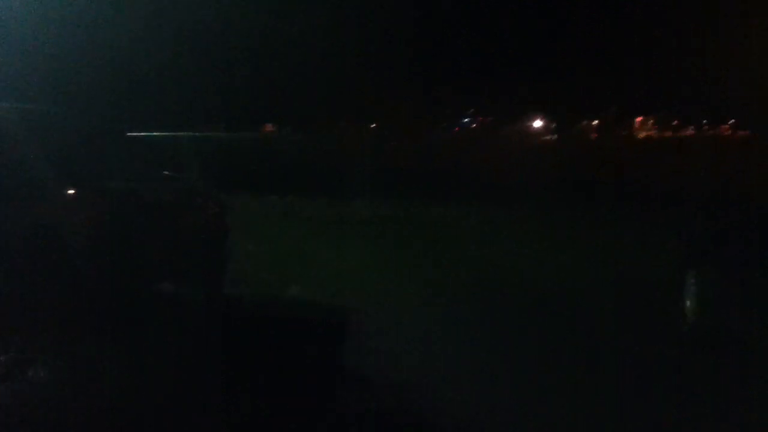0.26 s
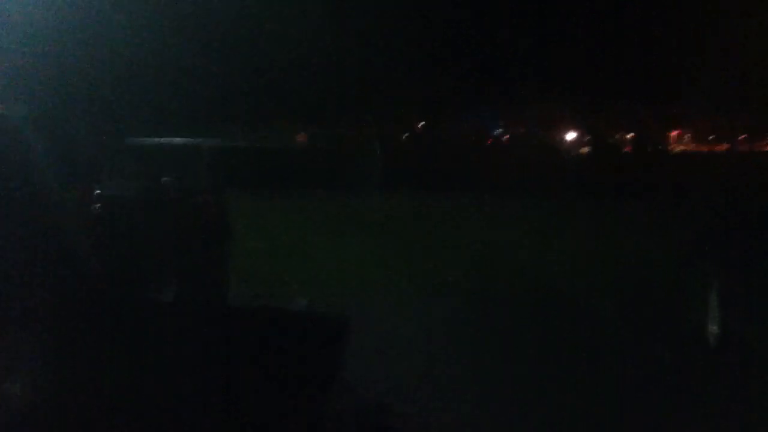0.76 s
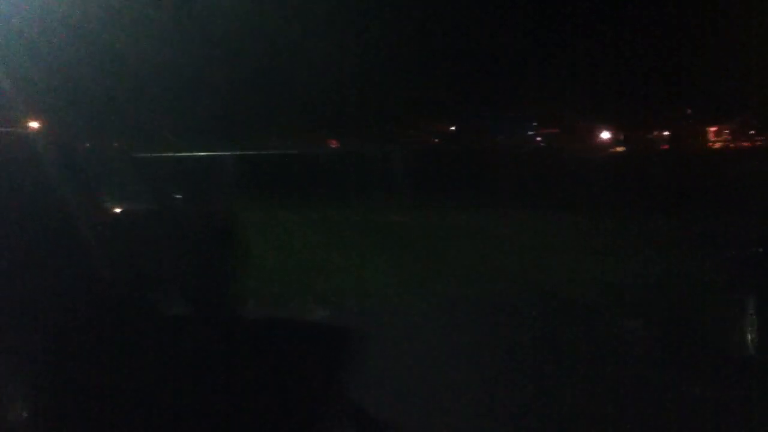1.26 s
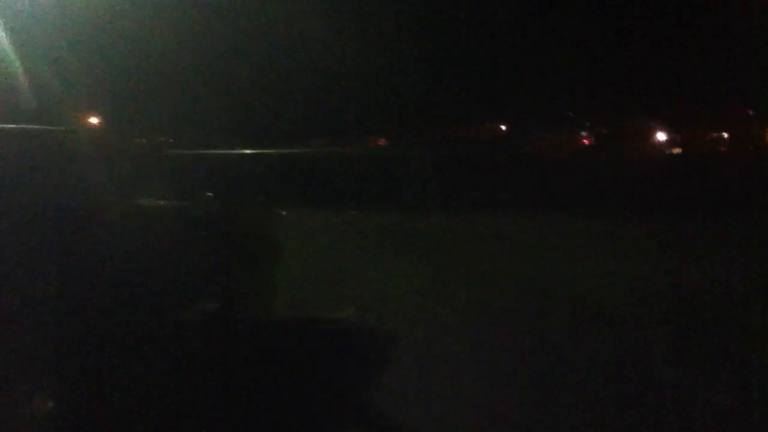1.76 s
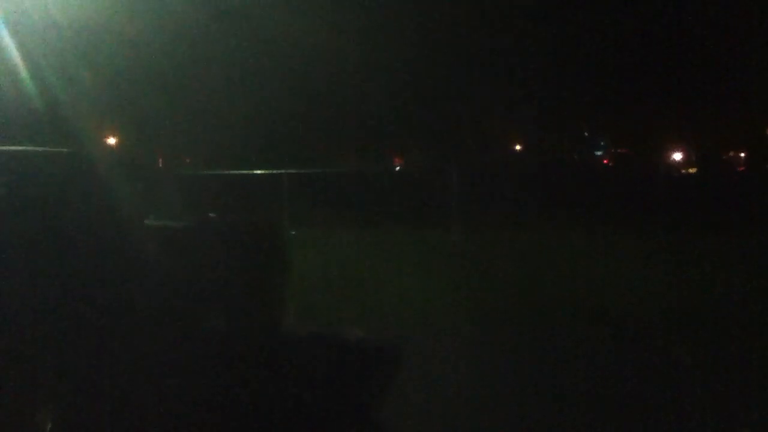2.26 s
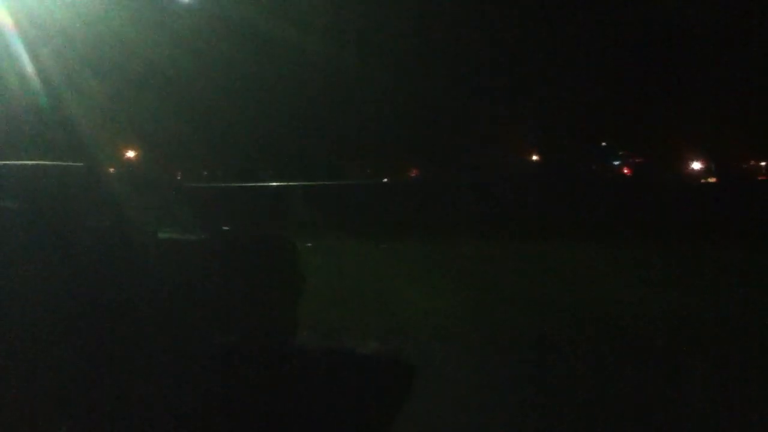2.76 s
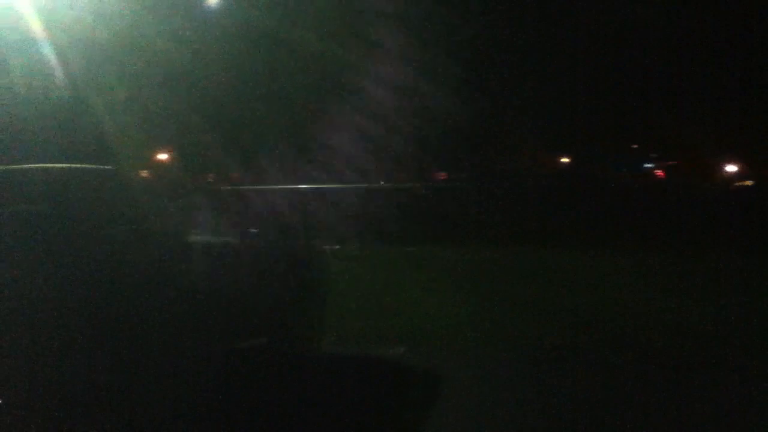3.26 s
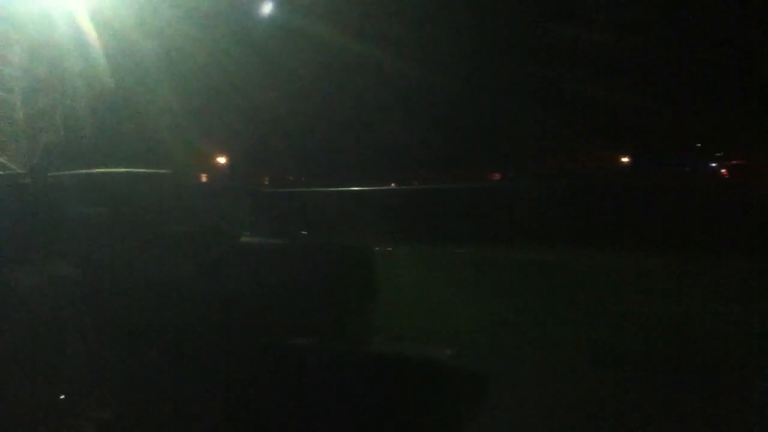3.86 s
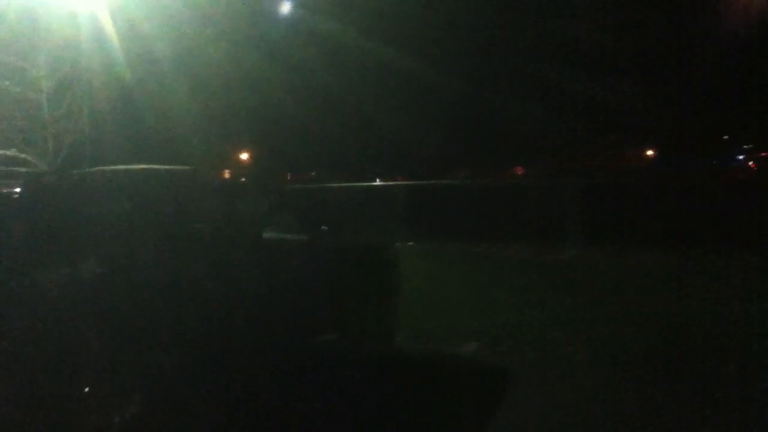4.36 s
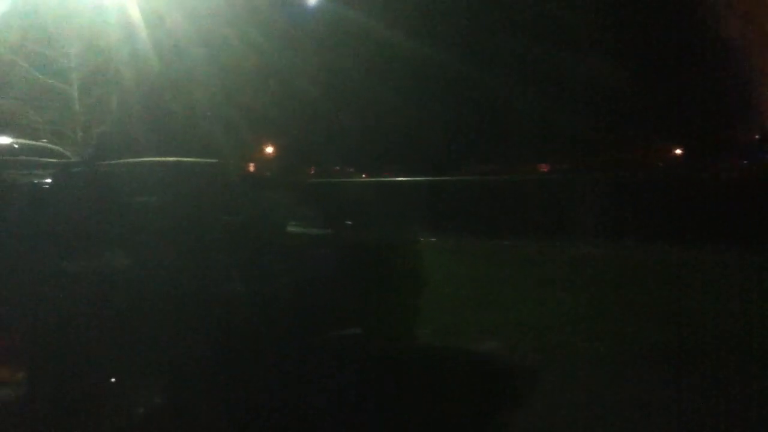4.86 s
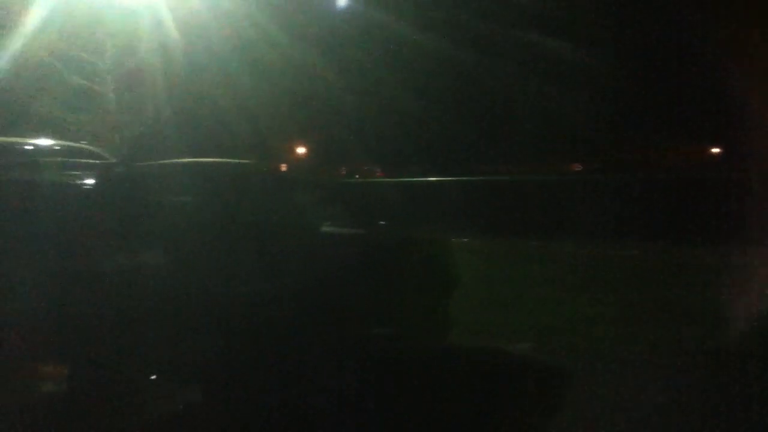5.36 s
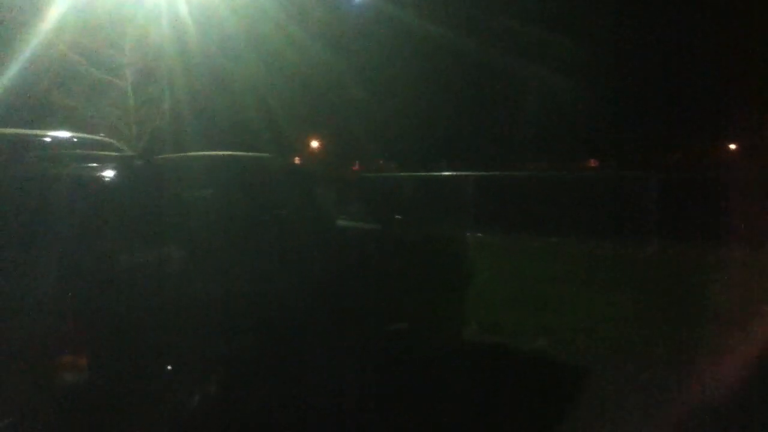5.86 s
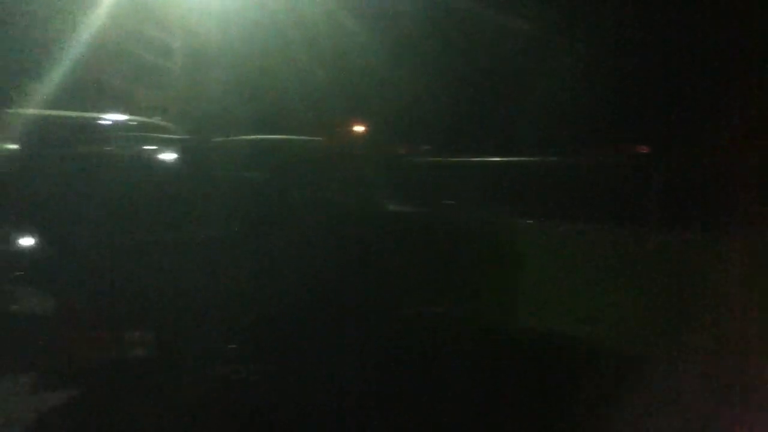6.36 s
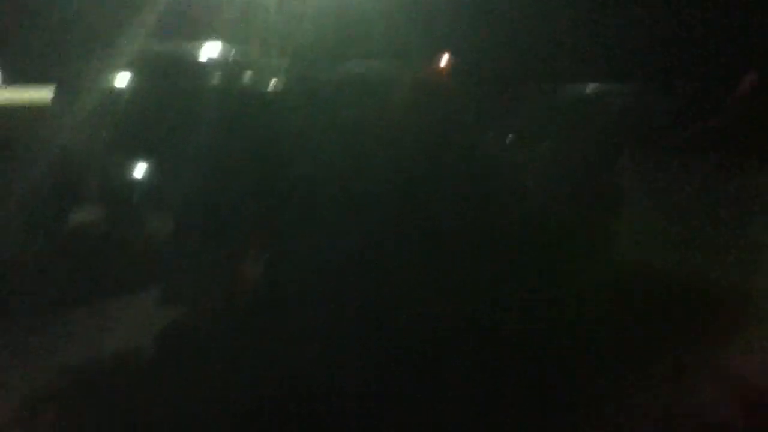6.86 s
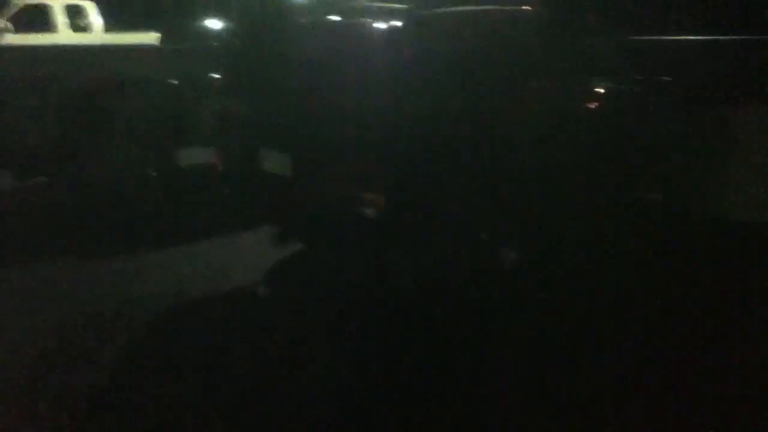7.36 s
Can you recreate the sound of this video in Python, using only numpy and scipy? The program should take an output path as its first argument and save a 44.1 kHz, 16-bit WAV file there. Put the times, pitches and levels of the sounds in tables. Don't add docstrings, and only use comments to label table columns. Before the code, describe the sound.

Outdoors at night between walls, a pickup with open exhaust pulls away with a low, lugging, blatting growl. Around two seconds it kicks down, jumps in pitch and climbs into a loud, crackling rasp scattered by echoes. Near six seconds the throttle lifts, a tiny puff of air escapes and the engine runs down. Quiet hiss remains, then a hard finger click on the hand-held camera.

```python
import sys
import numpy as np
from scipy import signal
from scipy.fft import rfft, irfft
from scipy.io import wavfile
from scipy.ndimage import uniform_filter1d

SR = 44100
rng = np.random.default_rng(int(sys.argv[2]) if len(sys.argv) > 2 else 0)


def store_wav(level_fs):
    pcm = np.round(np.clip(np.atleast_2d(level_fs), -1, 1) * 32767)
    wavfile.write(sys.argv[1], SR, pcm.T.astype(np.int16))


def volts_from_db(level):
    exponent = np.asarray(level, float) / 20
    return 10 ** exponent


N = 336042
TIME = np.arange(N) / SR

# (time [s], rate [Hz])
SPEED = [(0, 46.9), (.5, 49.8), (.8, 51), (1.3, 52.6), (1.8, 54.1), (1.9, 57), (2.0, 65.1), (2.07, 69.6),
         (2.2, 68), (2.5, 71.7), (3, 78.3), (3.5, 84.5), (3.8, 87.2), (4.5, 96.7), (5, 102.8), (5.3, 105.8),
         (5.8, 109.1), (6.2, 108.2)]
# (time [s], level [dB])
LOUDNESS = [(0, -46.5), (.45, -44), (1.3, -40), (1.45, -36.5), (2.0, -35.5), (2.27, -37.5), (2.8, -35.5),
            (3.5, -31), (4.3, -31.5), (5.0, -30.5), (5.5, -30), (5.78, -33.5), (6.02, -37.5), (6.17, -42),
            (6.36, -49.5), (6.66, -61), (7.4, -77)]
# (time [s], length [s], rasp gain [dB], extra direct share [0-1])
CLEAR = [
    (1.62, 0.16, 1, 0),
    (2.442, 0.075, 4, 0.2),
    (3.57, 0.091, 3, 0.28),
    (4.107, 0.13, 3, 0.2),
    (4.804, 0.3, 0.5, 0.03),
    (5.242, .07, 3, 0.4),
    (5.45, 0.085, 4.5, 0.56),
    (5.625, 0.089, 0.8, 0.33),
    (5.903, 0.056, 1, .1),
]
CYLINDERS = [2.5, -1.2, -.6]
# (delay [s], level [dB])
SHOCK_ECHOES = [(.0012, -8), (.0024, -11), (.0047, -8), (.0066, -12)]
# (frequency [Hz], density [dB per Hz])
SHOCK_SPECTRUM = [(300, -88), (1200, -25.5), (2200, -2), (3400, 2.5), (4300, -4), (5600, -11), (8000, -40),
                  (11000, -49), (15000, -89)]
# (frequency [Hz], density [dB per Hz])
CRACK_SPECTRUM = [(880, -41), (1500, -2), (1630, 1), (1880, 0.5), (3170, -1), (3860, -0.5), (5800, -17),
                  (7540, -50), (12800, -120)]
# (frequency [Hz], density [dB per Hz])
BODY_SPECTRUM = [(240, -29), (400, -9), (453, -17.5), (522, -1.5), (662, -4.5), (855, 2), (1020, -0.5),
                 (1310, 2.5), (1550, -3.5), (2020, -24.5), (3410, -120)]
# (frequency [Hz], density [dB per Hz])
SIZZLE_SPECTRUM = [(3350, -14.5), (5700, 2), (6560, -8.5), (7930, -10), (9640, -21.5), (11000, -53),
                   (14300, -52), (22000, -120)]
# (time [s], frequency [Hz])
BODY_LIFT = [(0, 690), (.9, 540), (2.2, 780), (2.6, 815), (4.0, 930), (4.5, 1180), (5.05, 805), (6.6, 760)]
# (frequency [Hz], width [Hz], level [dB])
YARD_RIDGES = [(1347, 37, 5), (1500, 77, -5), (2340, 120, 1), (3120, 66, 3.5), (3710, 24, -3.5)]
# (frequency [Hz], level [dB])
PIPE_TONES = [(60, -64.5), (97, -29), (110, -32.5), (145, -27), (167, -34), (180, -39.5), (197, -35.5),
              (255, -47)]
# (time [s], level
# [dB])
TONE_BEATS = [
    [(2.72, -20), (3.35, 0), (3.8, -11), (4.08, -6.5), (4.6, -4.5), (4.93, -25), (5.18, -10)],
    [(.17, -31), (.6, -17), (.86, -12), (1.23, -22), (2.17, -12), (2.36, -14), (2.53, -15), (2.77, -8),
     (3.69, 0), (3.88, -9), (4.23, -18), (4.49, -18), (5.0, -20), (5.16, 5), (5.27, -1)],
    [(1.6, 14), (2.17, -8), (2.74, 8), (3.27, -4.5), (4.08, -12)],
    [(1.5, -2), (2.22, 14.5), (3.95, 6)],
]
BEAT_LENGTHS = [0.059, 0.063, 0.13, 0.17]
# (order [thirds], level [dB])
UNEVEN = [(4, -11), (5, -26), (8, -21)]
# (frequency [Hz], level [dB])
UPPER_PIPE = [(200, -7), (260, -5), (315, -8), (340, -24), (450, -27), (520, -19), (600, -25), (750, -19),
              (900, -24)]
# (frequency [Hz], density [dB per Hz])
RUMBLE_SPECTRUM = [(15, -27), (30, -8), (50, -11), (80, -3.5), (150, 3.5), (250, -3.5), (330, -16.5),
                   (450, -18), (600, -58), (1500, -115)]
# (time [s], frequency [Hz], level [dB])
OVERRUN = [(5.65, 99, -60), (5.8, 95, -43), (5.95, 86, -43), (6.1, 72, -46), (6.25, 64, -49),
           (6.4, 60, -54), (6.5, 58, -70)]
# (time [s], length [s], level [dB])
BLATS = [
    (0.055, 0.055, -45),
    (0.763, 0.053, -45),
    (1.61, 0.054, -36.5),
    (1.755, 0.047, -47.5),
    (1.996, 0.086, -44.5),
    (3.597, 0.25, -46.5),
]
# (frequency [Hz], density [dB per Hz])
BLAT_SPECTRUM = [(60, -52), (120, -16), (220, 14.5), (400, 4), (650, -6.5), (800, -19), (1100, -38),
                 (2500, -96)]
# (time [s], level [dB])
VENT = [
    (6.088, -75),
    (6.094, -49),
    (6.12, -59),
    (6.16, -66),
    (6.19, -81),
]
# (frequency [Hz], width [Hz], level [dB])
VENT_BANDS = [(9100, 680, 5), (6850, 900, 3), (8100, 520, 1)]
# (frequency [Hz], level [dB], decay time t60 [s])
SHELL = [(710, 1.5, 0.0064), (960, -4, 0.0051), (2460, -9, 0.0032), (3360, 5.5, 0.0021), (4800, -4, .003),
         (7160, 4.5, 0.0016), (8160, -7, 0.002), (11100, -6, 0.002), (14400, -8, 0.0017)]
# (time [s], peak [dB], brightness [dB per octave])
CLICKS = [(7.1335, -37, -3), (7.145, -45, -1), (7.4586, -3.2, 0), (7.4735, -36, -4), (7.5235, -39, -4),
          (7.5455, -50, 0), (7.574, -53, -3), (7.5963, -48, -3), (7.6135, -50, 0), (7.615, -49, 0),
          (7.6165, -49, 0)]
# (time [s], peak [dB], width [s])
THUMP = (7.615, -37.5, 0.00089)
# (frequency [Hz], level [dB rms])
WHINE = [(14992, -70)]
# (frequency [Hz], density [dB per Hz])
NIGHT_SPECTRUM = [(18, -20), (35, -21.5), (65, -1.5), (100, 2.5), (200, -5.5), (400, -15.5), (800, -12.5),
                  (1400, -17.5), (2200, -20.5), (3500, -22.5), (5000, -28.5), (7000, -31.5), (11000, -34.5),
                  (16000, -37.5)]
# (start [s], end [s], level [dB])
HOLES = [
    (7.44, 7.458, -34),
    (7.466, 7.473, -11),
    (7.601, 7.607, -16),
]
# (start [s], end [s], level [dB])
SMEAR = (7.455, 7.464, -43)

STRONG_FIRING_S = 5.4661
HIDDEN_SHARE, LIFT_HZ, LIFT_HZ_PER_DB = 0.023, 2800, 87
BODY_DB, BODY_SLOPE, SIZZLE_DB = -7.5, -0.32, -18.5
RUMBLE_DB, SMOOTHING_DB_PER_HZ, RUMBLE_FLOOR_DB = 6, -0.3647, -55
LUG_S, LUG_LENGTH_S, LUG_DB = 1.85, 0.35, 3.5
ORDERS_DB, TALL_GEAR_DB = [0.24, 0.6, -3, -10], [2, -9, -23, 2]
KICK_S, KICK_LENGTH_S = 2.09, 0.25
FADE_HZ, FADE_DB_PER_HZ = 384, -0.16
SHUT_S, SHUT_EARLIER_S, SHUT_DB_PER_S = 5.97, 0.15, -150
HONK_S, HONK_LENGTH_S, HONK_DB, HONK_HZ, HONK_WIDTH_HZ = 1.69, 0.075, -43.5, 660, 120
NIGHT_DB = -46.5


def truck():
    hz = curves(SPEED)[0]
    turns = np.cumsum(hz) / SR
    turns -= turns[round(STRONG_FIRING_S * SR)]
    hidden_db = curves(LOUDNESS)[0]
    clear_db = sum(db * bump(s, length) for s, length, db, _ in CLEAR)
    extra_share = sum(more * bump(s, length) for s, length, _, more in CLEAR)
    share = np.clip(HIDDEN_SHARE + extra_share, 0, 1)
    body_db = hidden_db + BODY_DB + BODY_SLOPE * np.maximum(hidden_db + 36.5, -22)
    shocks, scatter = cracks(turns, LIFT_HZ + LIFT_HZ_PER_DB * clear_db)

    direct = np.sqrt(share) * colour(shocks, SHOCK_SPECTRUM)
    diffuse = np.sqrt(1 - share) * colour(scatter, CRACK_SPECTRUM)
    rasp = volts_from_db(hidden_db + clear_db) * (direct + diffuse)
    body = volts_from_db(body_db) * colour(scatter, BODY_SPECTRUM)
    sizzle = volts_from_db(hidden_db + 0.63 * clear_db + SIZZLE_DB) * colour(scatter, SIZZLE_SPECTRUM)
    tones = pipes(turns, hz, low_orders(hz), body_db)
    return rasp + body + sizzle + engine(hz, hidden_db) + tones + blats(scatter)


def cracks(turns, lift_hz):
    at = np.flatnonzero(np.diff(np.floor(turns)) > 0)
    luck = rng.standard_normal((len(at), 2))
    late = np.clip(at + (7.0 * luck[:, 1]).astype(int), 0, N - 1)
    cylinder = np.floor(turns[at + 1]).astype(int) % 3
    shocks = np.zeros(N)
    shocks[late] = volts_from_db(np.take(CYLINDERS, cylinder) + 1.5 * luck[:, 0])
    echoes = sum(volts_from_db(db + 2.5 * wander(30)) * np.roll(shocks, round(s * SR)) for s, db in SHOCK_ECHOES)
    shocks = shocks + echoes
    swell = signal.lfilter([1], [1, -np.exp(-1 / (0.006 * SR))], shocks)
    scatter = (1 + 0.32 * evened(swell)) * volts_from_db(0.7 * wander(25)) * rng.standard_normal(N)
    return evened(shocks), shifting(scatter, lift_hz, patchy_db=2.08)


def shifting(x, lift_hz, patchy_db):
    hz, t, z = signal.stft(x, SR, nperseg=512)
    luck = rng.standard_normal((z.shape[1], z.shape[0], 2)).T
    broad = uniform_filter1d(uniform_filter1d(luck[0], size=5, axis=0), size=30, axis=1)
    fine = uniform_filter1d(luck[1], size=24, axis=1)

    def near(centre_hz):
        centre = np.interp(t, TIME, centre_hz)
        return np.exp(-(np.log(hz[:, None] / centre + 1e-9) / 0.33) ** 2)

    field_db = patchy_db * (0.29 * evened(broad) + evened(fine))
    field_db = field_db + 3.1 * near(lift_hz) + 5.25 * near(curves(BODY_LIFT)[0])
    ridges_db = sum(db * np.exp(-((hz - f) / width) ** 2) for f, width, db in YARD_RIDGES)
    return evened(signal.istft(z * volts_from_db(field_db + ridges_db[:, None]), nperseg=512)[1][:N])


def pipes(turns, hz, orders_db, body_db):
    def tone(order, db, smear):
        phase = order * (2 * np.pi * turns - 1.9) + smear * wander(6.5)
        return np.sqrt(2) * volts_from_db(db) * np.cos(phase)

    low = sum(tone(k + 1, db + 1.4 * wander(10), 0.25) for k, db in enumerate(orders_db))
    mean_db = (orders_db[0] + orders_db[1]) / 2
    thirds = sum(tone(k / 3, mean_db + db + 0.8 * wander(2.85), 0.69) for k, db in UNEVEN)
    upper_db = body_db + np.minimum(orders_db[1] + 69, 0)
    upper = sum(tone(k, upper_db + read(UPPER_PIPE, k * hz) + 4 * wander(4), 1.1) for k in range(5, 9))
    return low + thirds + upper


def low_orders(hz):
    tall = np.clip((KICK_S - TIME) / KICK_LENGTH_S, 0, 1)
    levels = []
    for i in range(4):
        f = (i + 1) * hz
        pipe_db = read(PIPE_TONES, f) + FADE_DB_PER_HZ * np.maximum(f - FADE_HZ, 0)
        gear_db = ORDERS_DB[i] + TALL_GEAR_DB[i] * tall
        beats_db = sum(20 * np.log10(1 + (volts_from_db(db) - 1) * bump(s, BEAT_LENGTHS[i]))
                       for s, db in TONE_BEATS[i])
        shut_db = SHUT_DB_PER_S * np.maximum(TIME - SHUT_S + SHUT_EARLIER_S * i, 0)
        levels.append(pipe_db + gear_db + beats_db + shut_db)
    return levels


def engine(hz, hidden_db):
    down_hz, down_db = curves([(5.6, 99, -90)] + OVERRUN)
    crank_hz = np.where(TIME < SHUT_S - 0.1, hz, down_hz)
    smooth_db = SMOOTHING_DB_PER_HZ * np.maximum(crank_hz - 54, 0)
    rumble_db = hidden_db + RUMBLE_DB + LUG_DB * bump(LUG_S, LUG_LENGTH_S) + smooth_db
    rumble_db = np.maximum(rumble_db, RUMBLE_FLOOR_DB) - 6.5 + 0.41 * wander(12.0)
    rumble = volts_from_db(rumble_db) * colour(rng.standard_normal(N), RUMBLE_SPECTRUM)
    low = volts_from_db(down_db) * resonate(rng.standard_normal(N), down_hz, 16.0)
    high = volts_from_db(down_db - 5.5) * resonate(rng.standard_normal(N), down_hz + 180, 35.0)
    return rumble + low + high


def blats(scatter):
    level = sum(volts_from_db(db) * bump(s, length) for s, length, db in BLATS)
    rough = volts_from_db(1.1 * wander(40)) * colour(scatter[::-1], BLAT_SPECTRUM)
    honk = volts_from_db(HONK_DB) * bump(HONK_S, HONK_LENGTH_S) * resonate(scatter, HONK_HZ, HONK_WIDTH_HZ)
    return level * rough + honk


def vent():
    air = rng.standard_normal(N)
    hiss = sum(volts_from_db(db) * resonate(air, hz, width) for hz, width, db in VENT_BANDS)
    return volts_from_db(curves([(6.08, -110)] + VENT + [(6.2, -110)])[0]) * evened(hiss)


def handling():
    t, out = np.arange(900) / SR, np.zeros(N + 900)
    hz, db, t60 = np.transpose(SHELL)[:, :, None]
    build_up = 1 - np.exp(-1.6 * hz * t)
    modes = np.sin(2 * np.pi * hz * t) * build_up * volts_from_db(db - 60 * t / t60)
    for s, peak_db, tilt_db in CLICKS:
        ring = (volts_from_db(tilt_db * np.log2(hz / 2000)) * modes).sum(0)
        ring = ring - uniform_filter1d(ring, size=160, mode="constant")
        out[round(s * SR):][:900] += volts_from_db(peak_db) * ring / abs(ring).max()
    push_s, push_db, width_s = THUMP
    u = (TIME - push_s) / width_s
    return out[:N] + volts_from_db(push_db) * (1 - 0.5 * u ** 2) * np.exp(-0.25 * u ** 2)


def whine():
    return sum(np.sqrt(2) * volts_from_db(db) * np.sin(2 * np.pi * hz * TIME + 0.5 * wander(8)) for hz, db in WHINE)


def night_air():
    return volts_from_db(NIGHT_DB + 0.53 * wander(5.3)) * colour(rng.standard_normal(N), NIGHT_SPECTRUM)


def evened(x):
    return x / np.sqrt(np.mean(x ** 2) + 1e-20)


def curves(rows):
    s, *columns = np.transpose(rows)
    return [np.interp(TIME, s, c) for c in columns]


def bump(s, length):
    return np.exp(-((TIME - s) / length) ** 2)


def read(points, hz):
    f, value = np.transpose(points)
    return np.interp(np.log(hz + 1), np.log(f + 1), value)


def colour(x, points):
    level_db = np.maximum(read(points, abs(np.fft.fftfreq(8192, 1 / SR))), -100)
    log_gain = np.log(volts_from_db(level_db))
    taps = np.fft.ifft(np.exp(np.conj(signal.hilbert(log_gain)))).real[:4096]
    return evened(signal.oaconvolve(x, taps)[:N])


def wander(hz):
    count = 2 ** 13
    low_pass = 1 / (1 + (np.arange(count // 2 + 1) * SR / N / hz) ** 4)
    slow = irfft(rfft(rng.standard_normal(count)) * low_pass)
    return np.interp(np.arange(N) * count / N, np.arange(count), evened(slow))


def resonate(x, hz, width_hz):
    turn = np.exp(2j * np.pi * np.cumsum(hz * np.ones(N)) / SR)
    r = np.exp(-np.pi * width_hz / SR)
    smooth = signal.lfilter([1], np.convolve([1, -r], [1, -r]), x / turn)
    return evened((turn * smooth).real)


def scene():
    air = truck() + vent() + night_air() + whine()
    duck_db = curves([(7.46, 0.5), (7.466, -3), (7.53, -8.5), (7.57, -13.5), (7.62, -3.5)])[0]
    return (air * volts_from_db(duck_db) + handling())[None]


def without_faint_treble(x):
    hz, t, z = signal.stft(x, SR, nperseg=2048, noverlap=1024)
    row_hz = hz[:, None]
    power_db = 10 * np.log10(uniform_filter1d(abs(z) ** 2, size=6, axis=0) + 1e-20)
    loud_db = 10 * np.log10((abs(z[hz > 1500]) ** 2).sum(0) + 1e-12)
    usual_db = np.median(power_db[abs(hz - 12500) < 500])
    limit_db = usual_db - 0.1 + 0.22 * (loud_db - np.median(loud_db))
    limit_db = limit_db + 4 * (row_hz > 13900) + 18 * (row_hz > 15800)
    click_s = CLICKS[2][0]
    keep = (power_db > limit_db) | (row_hz < 8000)
    keep = keep | (abs(t - click_s) < 0.02) | ((t > click_s) & (row_hz < 15800))
    return signal.istft(z * keep, nperseg=2048, noverlap=1024)[1][:N]


def roll_off(x):
    return signal.sosfilt(signal.butter(12, 16830, fs=SR, output="sos"), x)


def record(dry):
    high_pass = signal.firwin(401, 1500, fs=SR, pass_zero=False)
    treble = signal.oaconvolve(dry, high_pass[None], "same")
    gap = sum((1 - volts_from_db(db)) * (TIME > a) * (TIME < b) for a, b, db in HOLES)
    start_s, end_s, smear_db = SMEAR
    smear = volts_from_db(smear_db) * (TIME > start_s) * (TIME < end_s) * rng.standard_normal(N)
    gapped = dry - treble * uniform_filter1d(gap, size=40) + smear
    low_pass = signal.firwin(101, 16300, window=("kaiser", 7), fs=SR)
    limited = signal.oaconvolve(gapped, low_pass[None], "same")
    finished = without_faint_treble(limited[0])[None]
    return roll_off(finished)


dry = scene()
out = record(dry)
store_wav(out)
```